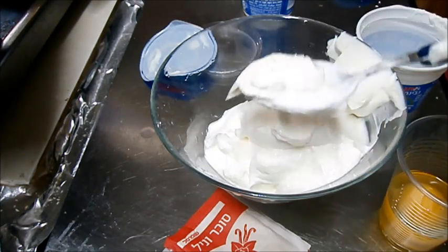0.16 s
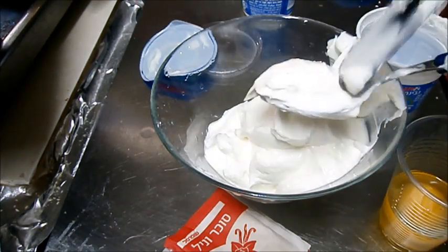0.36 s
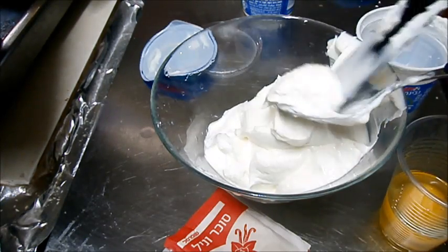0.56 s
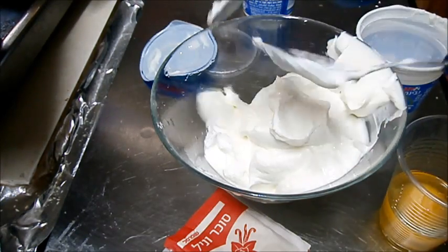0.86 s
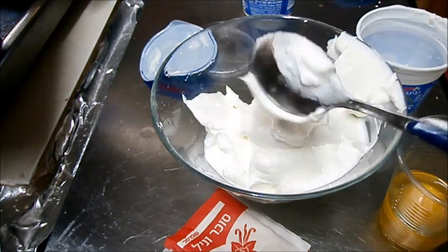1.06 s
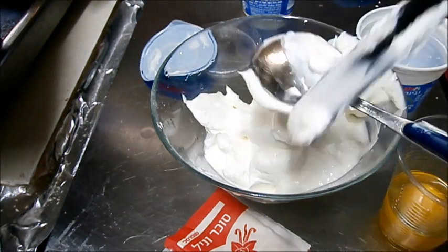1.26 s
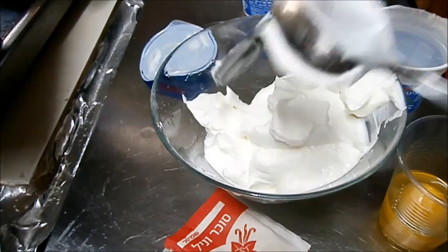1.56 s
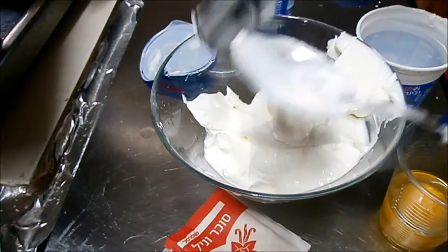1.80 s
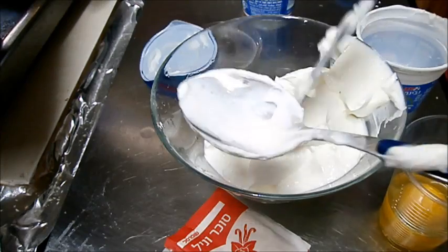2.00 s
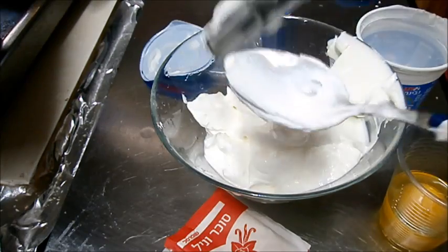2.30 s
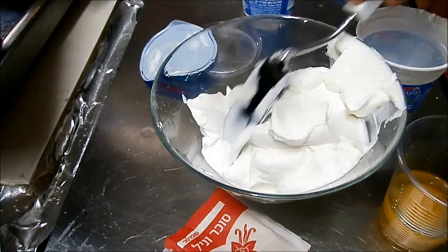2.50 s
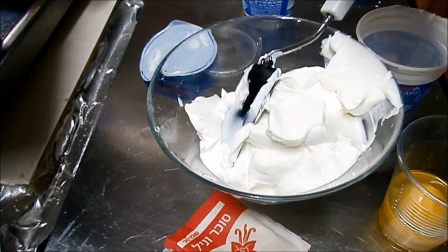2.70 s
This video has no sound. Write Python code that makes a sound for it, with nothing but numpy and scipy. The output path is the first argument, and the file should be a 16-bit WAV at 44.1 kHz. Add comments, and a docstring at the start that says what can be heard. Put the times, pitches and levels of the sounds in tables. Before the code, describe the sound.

Metal knife and spoon tick and scrape while pushing soft cheese into a glass bowl, ending in a hard clack

```python
"""A knife pushes soft cheese off a steel spoon into a glass bowl, close by in a small kitchen.
Room noise and a thin, fluttering whine run throughout. Light touches of steel tick, as noise bursts and
short-lived tones; cheese smears faintly, as swells of crackle and squeak. A long, then a short scrape come
among these touches and smears, as uneven pulses through resonances over a rasp. Near the end one hard
clack, a noise burst and stronger tones, overloads the microphone; two light touches come after it."""
import sys
import numpy as np
from scipy import signal
from scipy.fft import rfft, irfft, next_fast_len
from scipy.io import wavfile
from scipy.ndimage import map_coordinates

SR = 44100
rng = np.random.default_rng(int(sys.argv[2]) if len(sys.argv) > 2 else 0)


def dump(signal):
    """Clip the signal to [-1, 1] and save it as 16-bit WAV at the path in sys.argv[1]."""
    limited = np.clip(np.atleast_2d(signal).T, -1, 1)
    pcm = np.round(limited * 32767).astype(np.int16)
    wavfile.write(sys.argv[1], SR, pcm)


N = 125685  # length in samples

# Colour of the room noise: pitch_hz, level_db (relative)
FLOOR_COLOUR = [(15, -22), (30, -3.5), (54, -2.5), (86, -4), (150, 0.5), (265, 1), (513, -5), (914, -5.5),
                (1340, -12.5), (2200, -16.5), (4040, -16), (5030, -20), (7000, -16), (8700, -14),
                (10300, -21.5), (12000, -22.5), (13400, -21), (14300, -29.5)]
FLOOR_DB = -43
WHINE_HZ, WHINE_DB = 14960, -40.5  # level before dips and wavering
FLUTTER_HZ, FLUTTER_DEPTH = 57.4, 0.66  # depth is a fraction of the loudness
DIP_WIDTH_S, DIP_GAP_S = .001, 0.003  # two brief dips in each flutter cycle
WHINE_WAVER_DB, WAVER_PER_S = 1, 700

# Light touches of the cutlery: start_s, then six level_db, one for each tap band
TAPS = [(0.3831, -29, -14.5, -21, -14, -4.5, -5), (0.4922, -29.5, -29, -26.5, -23.5, -15, -27),
        (.870, -46, -48, -37, -26, -22, -34), (1.2221, -32, -25, -8, -4, -1, -5.5),
        (1.4461, -52, -48, -43, -26, -37, -17.5), (1.4591, -52, -31, -13, -13, -21, -12),
        (2.0771, -53, -30.5, -25.5, -19.5, -22, -23), (2.4894, -9.5, -17, -10, -4.5, -22, -16.5),
        (2.7922, -48, -36, -46, -52, -29, -33), (2.8315, -50, -51, -47, -44, -30, -32)]
# Where those six levels apply: pitch_hz
TAP_BANDS_HZ = [997, 1640, 2650, 4000, 5100, 6840]
# Tones of cutlery damped by cheese and hand: pitch_hz, level_db (relative), t60_s (time to fall 60 dB)
TAP_MODES = [(590, -13, .008), (1127, -1, 0.018), (1655, -7, 0.027), (2070, -1, 0.0061), (2850, -1, 0.0077),
             (3680, 0, 0.0085), (4550, -3, 0.0053), (6110, -2.5, 0.0064), (7030, 5.5, 0.0048),
             (7600, -21, 0.0055), (10900, -18, .006)]
# Colour of the noise at each touch: pitch_hz, level_db (relative)
TAP_CRACK_COLOUR = [(100, -14), (700, -4), (2000, -21), (7500, 18), (10000, -4), (15000, -26)]
TAP_RISE_S = .0005
TAP_MODES_DB, TAP_CRACK_DB, TAP_CRACK_T60_S = -1, -2.5, 0.0081
REBOUND_S, REBOUND_DB = 0.000898, -0.5  # the steel meets again at once with a second crack
TAP_LOW_HZ = 447  # small cutlery radiates little below this

# Cheese smears: start_s, length_s, level_db (relative)
SMEARS = [(0.522, 0.18, -47.5), (0.803, .22, -51.5), (1.38, 0.16, -50.5), (1.54, 0.14, -56.5),
          (2.164, 0.067, -46.5), (2.22, 0.21, -55), (2.395, 0.28, -46)]
# Colour of the sticky crackle: pitch_hz, level_db (relative)
CHEESE_COLOUR = [(600, -26), (1800, -1), (4100, -19), (5000, -8), (7000, 0), (11000, -17), (15000, -28)]
# Resonances under the smearing: pitch_hz, width_hz, level_db (relative)
SQUEAK = [(2380, 120, -5.5), (3130, 180, -15), (3570, 350, -8), (4110, 220, -1)]
CRACKLE_DB, SQUEAK_DB = -3.5, -1.5
SQUEAK_WANDER_DB, WANDER_PER_S = -2, 12

# How hard steel slides on steel, long stroke: start_s, pressure_db
LONG_STROKE = [(.675, -48), (.688, -32), (.693, -18), (.6985, -21), (.701, -7.5), (.708, -13),
               (.713, -19.5), (.738, -16), (.749, -16), (.754, -29.5), (.768, -27), (.785, -48)]
# The same for the short stroke: start_s, pressure_db
SHORT_STROKE = [(1.457, -55), (1.4595, -13), (1.462, -10.5), (1.4655, -9), (1.469, -15.5), (1.472, -13),
                (1.476, -28), (1.481, -57)]
# Resonances under the long stroke: pitch_hz, width_hz, level_db (relative)
LONG_BODY = [(973, 136, -3), (1770, 130, -2.5), (1940, 290, -6.5), (2900, 330, -3), (3590, 240, 1.5),
             (4080, 220, 2.5), (4300, 350, -1.5), (5340, 710, -4.5), (7150, 1000, -7.5)]
# Resonances under the short stroke: pitch_hz, width_hz, level_db (relative)
SHORT_BODY = [(3300, 340, -14.5), (4180, 260, -9.5), (5780, 220, -7), (6380, 140, 3), (7000, 510, -1.5)]
# Colour of the long stroke's rasp: pitch_hz, level_db (relative)
LONG_RASP = [(240, -57), (400, -39), (734, -40), (1010, -4.5), (1350, -19), (1720, 0), (2250, -11),
             (3610, -5), (7130, -10), (15000, -32)]
# Colour of the short stroke's rasp: pitch_hz, level_db (relative)
SHORT_RASP = [(240, -81), (400, -44), (920, -16.5), (2570, -24), (3460, -6), (3780, -34), (4130, -19),
              (6560, -4.5), (14000, -34.5)]
RASP_TOP_HZ = 14300
# The lows grow less with pressure, so a light touch is duller
SCRAPE_LOW_HZ, LOW_FOLLOWS, MID_PRESSURE_DB = 1320, 0.66, -25.5

# Tones of the hard blow: pitch_hz, level_db (relative), t60_s
CLACK_MODES = [(90, -33.5, 0.056), (199, -22.5, 0.031), (527, -29, 0.0079), (1016, -7.5, 0.029),
               (1370, -9.5, 0.014), (1566, -9.5, 0.015), (2140, -14.5, .018), (2570, -5.5, 0.0092),
               (3140, -3.5, 0.0089), (3734, -2, 0.012), (4150, -6, 0.018), (5145, -2.5, 0.014),
               (5920, -13, 0.02), (6907, 7, 0.013), (7175, 0, 0.015), (8310, -9, 0.0094)]
# Faint lingering tones after the blow, mostly the room ringing on: pitch_hz, level_db (relative), t60_s
LINGER_MODES = [(2240, -18, 0.33), (2620, -1, .25), (3230, -8, 0.33), (3790, -12, .33), (4200, -11, 0.35),
                (5550, -10, 0.53), (6750, -4, 0.36), (7000, 8, 0.33)]
CLACK_S, CLACK_DB = 2.6256, 5
CLACK_CRACK_DB, CLACK_CRACK_T60_S = -4.5, 0.019  # level relative to the blow
LINGER_DB = -31

# First echoes off near walls: delay_s, level_db (relative to the direct sound)
WALLS = [(.0083, -18), (0.0128, -22.5), (0.0185, -20.5)]
# How long the room tail lasts: pitch_hz, t60_s
KITCHEN_T60 = [(150, 0.49), (1000, 0.29), (3500, 0.39), (7000, 0.27), (13000, 0.48)]
CLIP_TOP, TOP_HZ = 1.0, 15800  # the microphone's loudness and pitch limits


def amp(db):
    """Turn decibels into a gain."""
    return 10 ** (np.asarray(db) / 20)


def unit(x):
    """Scale a sound to an average (rms) strength of 1."""
    return x / np.sqrt(np.mean(x ** 2) + 1e-20)


def along(points, hz):
    """Read a value between (pitch, value) points, with pitch on a log axis."""
    f, v = np.transpose(points)
    return np.interp(np.log(hz + 1), np.log(f + 1), v)


def filtered(x, response):
    """Multiply each pitch in a sound by a response, which may also shift its phase."""
    size = next_fast_len(N + SR // 2)
    hz = np.fft.rfftfreq(size, 1 / SR)
    return irfft(rfft(x, size) * response(hz), size)[:N]


def coloured(x, spectrum):
    """Give a sound a (pitch, level) colour, at rms 1."""
    return unit(filtered(x, lambda hz: amp(along(spectrum, hz))))


def wobble(rate):
    """Draw a smooth random curve with this many random points a second."""
    points = rng.standard_normal(int(N * rate / SR) + 4)
    return map_coordinates(points, [np.arange(N) * rate / SR])


def resonance(f, hz, width):
    """Response of one resonance, strongest at hz."""
    return 1j * f * width / (hz * hz - f * f + 1j * f * width)


def add(track, s, sound):
    """Mix a sound into the track at time s, cut where the track ends."""
    part = track[round(s * SR):][:len(sound)]
    part += sound[:len(part)]


def ring(modes, rise_s):
    """Tones set off by one blow, each dying away at its own pace, with alternating signs."""
    t = np.arange(SR // 3) / SR
    tones = np.zeros(len(t))
    for k, (hz, db, t60) in enumerate(modes):
        tones += (-1) ** k * amp(db - 60 * t / t60) * np.sin(2 * np.pi * hz * t)
    return tones * (1 - np.exp(-t / rise_s))


def background():
    """Steady coloured room noise, and a high sine whine that flutters and wavers."""
    t = np.arange(N) / SR
    cycle_s = (t * FLUTTER_HZ % 1 - .5) / FLUTTER_HZ
    dips = np.exp(-((np.abs(cycle_s) - DIP_GAP_S / 2) / DIP_WIDTH_S) ** 2)
    whine = np.sqrt(2) * np.sin(2 * np.pi * WHINE_HZ * t)
    whine *= (1 - FLUTTER_DEPTH * dips) * amp(WHINE_WAVER_DB * wobble(WAVER_PER_S))
    floor = coloured(rng.standard_normal(N), FLOOR_COLOUR)
    return amp(FLOOR_DB) * floor + amp(WHINE_DB) * whine


def taps():
    """Each touch cracks twice and rings the same modes, weighted by where the steel meets."""
    out, t = np.zeros(N), np.arange(SR // 3) / SR
    crack_shape = amp(TAP_CRACK_DB - 60 * t / TAP_CRACK_T60_S) * (1 - np.exp(-t / TAP_RISE_S))
    for s, *levels in TAPS:
        weight = list(zip(TAP_BANDS_HZ, levels))
        # every tone is a little off its listed pitch at each touch
        modes = [(hz * (1 + rng.normal(0, 0.022)), db + along(weight, hz), t60)
                 for hz, db, t60 in TAP_MODES]
        noise = coloured(rng.standard_normal(N), TAP_CRACK_COLOUR)
        grit = filtered(noise, lambda hz: amp(along(weight, hz)))
        # two stretches of the noise make the two cracks
        contact, rebound = grit[:2 * len(t)].reshape(2, -1) * crack_shape
        add(out, s, amp(TAP_MODES_DB) * ring(modes, TAP_RISE_S) + contact)
        add(out, s + REBOUND_S, amp(REBOUND_DB) * rebound)
    return signal.lfilter(*signal.butter(2, TAP_LOW_HZ, "high", fs=SR), out)


def cheese(grain_db=4):
    """Soft swells of sticky crackle, with faint squeaks that shift from resonance to resonance."""
    t = np.arange(N) / SR
    swell = np.zeros(N)
    for s, length, db in SMEARS:
        progress = np.clip((t - s) / length, 0, 1)
        swell += amp(db) * np.abs(np.sin(np.pi * progress)) ** .5
    grains = rng.standard_normal(N) * amp(grain_db * rng.standard_normal(N))
    crackle = coloured(grains, CHEESE_COLOUR)
    squeak = np.zeros(N)
    for hz, width, db in SQUEAK:
        tone = unit(filtered(rng.standard_normal(N), lambda f: resonance(f, hz, width)))
        squeak += amp(db + SQUEAK_WANDER_DB * wobble(WANDER_PER_S)) * tone
    return swell * (amp(CRACKLE_DB) * crackle + amp(SQUEAK_DB) * unit(squeak))


def steel_body(f, body):
    """Resonances of the sliding steel, weak below 700 Hz and above 9000 Hz."""
    peaks = sum((-1) ** k * amp(db) * resonance(f, hz, width)
                for k, (hz, width, db) in enumerate(body))
    return peaks * (f / 700) ** 2 / (1 + (f / 700) ** 2) / (1 + (f / 9000) ** 6)


def scrape(stroke, body, rasp, slip_hz, scatter_db, rasp_db, chatter_db, chatter_hz):
    """Uneven stick-slip pulses ring the steel over a rasp; the pressure chatters through the stroke."""
    count = 5000
    gaps = rng.gamma(4, 1 / 4, count)  # uneven, 1 on average
    at = (np.cumsum(gaps) / slip_hz * SR).astype(int)
    slips = np.bincount(at, amp(scatter_db * rng.standard_normal(count)), N)[:N]
    steel = filtered(slips - slips.mean(), lambda f: steel_body(f, body))
    hiss = coloured(rng.standard_normal(N), rasp)
    hiss = filtered(hiss, lambda f: 1 / (1 + (f / RASP_TOP_HZ) ** 12))
    sound = unit(steel) + amp(rasp_db) * hiss
    sound = unit(sound * amp(chatter_db * wobble(chatter_hz)))
    s, db = np.transpose(stroke)
    pressure_db = np.interp(np.arange(N) / SR, s, db, left=-120, right=-120)
    lows = filtered(sound, lambda f: 1 / (1 + (f / SCRAPE_LOW_HZ) ** 8))
    lows_db = MID_PRESSURE_DB + LOW_FOLLOWS * (pressure_db - MID_PRESSURE_DB)
    return (sound - lows) * amp(pressure_db) + lows * amp(lows_db)


def crack(t60, top_hz):
    """The dying burst of noise at a hard contact, softened above top_hz."""
    t = np.arange(SR // 3) / SR
    lowpass = signal.butter(3, top_hz, fs=SR)
    noise = signal.lfilter(*lowpass, rng.standard_normal(len(t)))
    return unit(noise) * amp(-60 * t / t60)


def clack():
    """One hard blow: a crack, strong short modes and faint lingering tones, mostly the room's."""
    out = np.zeros(N)
    blow = ring(CLACK_MODES, rise_s=0.00018)
    blow += amp(CLACK_CRACK_DB) * crack(CLACK_CRACK_T60_S, top_hz=7940)
    lingering = ring(LINGER_MODES, rise_s=0.0049)
    add(out, CLACK_S, amp(CLACK_DB) * blow + amp(LINGER_DB) * lingering)
    return out


def kitchen(x, wet_db, onset_s=0.002):
    """Direct sound, a few near walls and a diffuse tail of noise that fades at its own pace per pitch."""
    hz, t, z = signal.stft(rng.standard_normal(SR // 2), SR, nperseg=256)
    fade = amp(-60 * t / along(KITCHEN_T60, hz)[:, None])
    tail = signal.istft(z * fade, SR, nperseg=256)[1]
    tail = tail * (1 - np.exp(-(np.arange(len(tail)) / SR / onset_s) ** 2))
    echoes = amp(wet_db) * tail / np.linalg.norm(tail)
    for s, db in WALLS:
        echoes[round(s * SR)] += amp(db)
    return x + signal.fftconvolve(x, echoes)[:N]


def scene():
    """Mix all sources into one channel; the steel sounds get the kitchen's echoes."""
    long_scrape = scrape(LONG_STROKE, LONG_BODY, LONG_RASP, slip_hz=520.8, scatter_db=0.5,
                         rasp_db=-2, chatter_db=2.0, chatter_hz=421.8)
    short_scrape = scrape(SHORT_STROKE, SHORT_BODY, SHORT_RASP, slip_hz=642, scatter_db=2.0,
                          rasp_db=-3.5, chatter_db=1, chatter_hz=590)
    mix = background() + kitchen(taps(), wet_db=-14.5) + cheese()
    mix += kitchen(long_scrape + short_scrape, wet_db=-15.5)
    mix += kitchen(clack(), wet_db=-12.5)
    return mix[None]


def record(dry):
    """The microphone clips at full scale, then keeps nothing above its band limit."""
    clipped = np.clip(dry[0], -CLIP_TOP, CLIP_TOP)
    return filtered(clipped, lambda hz: hz < TOP_HZ)[None]


dry = scene()
out = record(dry)
dump(out)
```